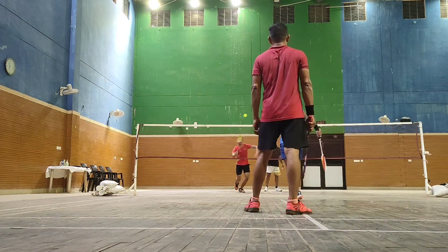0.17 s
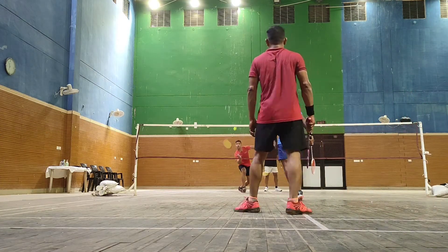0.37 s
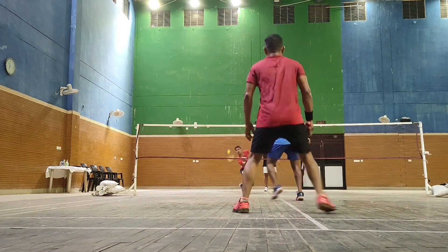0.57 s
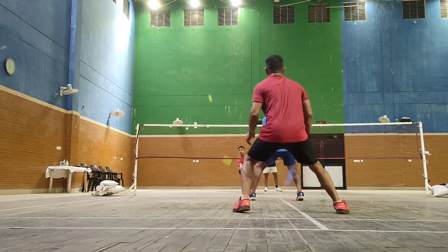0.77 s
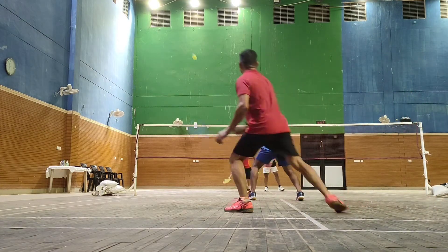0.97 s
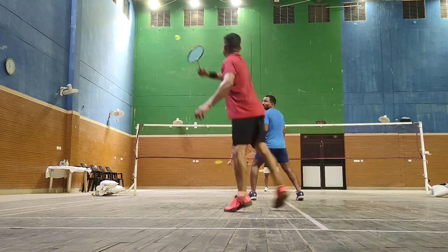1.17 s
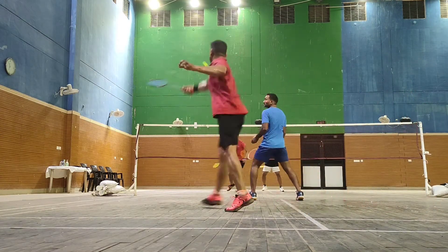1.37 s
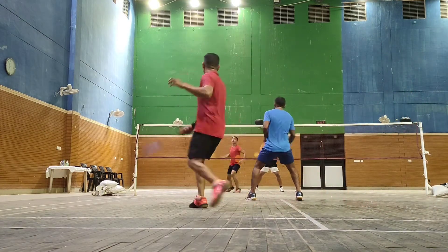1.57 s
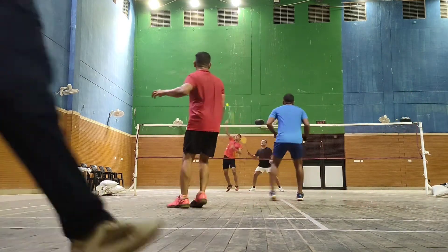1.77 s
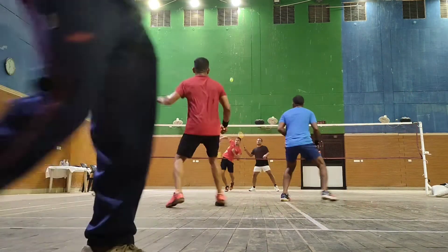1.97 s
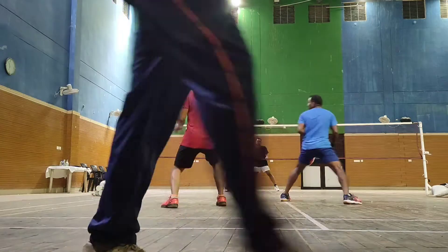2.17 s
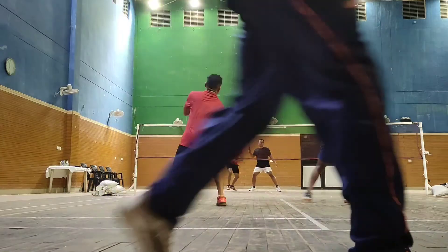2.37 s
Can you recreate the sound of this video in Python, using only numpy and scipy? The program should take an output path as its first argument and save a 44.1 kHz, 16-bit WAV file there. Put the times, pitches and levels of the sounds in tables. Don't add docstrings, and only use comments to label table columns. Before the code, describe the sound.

Badminton rackets hit a shuttlecock three times in a big reverberant hall, amid footsteps and rustling cloth.

```python
import sys
import numpy as np
from scipy import signal
from scipy.fft import rfft, irfft, next_fast_len
from scipy.io import wavfile
from scipy.ndimage import uniform_filter1d

SR = 44100
rng = np.random.default_rng(int(sys.argv[2]) if len(sys.argv) > 2 else 0)


def transcribe(u):
    v = np.clip(np.atleast_2d(u).T, -1, 1)
    q = np.round(v * 32767).astype(np.int16)
    wavfile.write(sys.argv[1], SR, q)


def convert_level_to_amplitude(level_db):
    exponent = np.asarray(level_db, float) / 20
    return 10 ** exponent


N = 106986

# frequency in Hz, level in dB.
HALL_SPECTRUM = [(60, -40), (150, -8.5), (400, -1), (1000, -2.5), (2500, 8), (5000, 5), (9000, -1),
                 (15000, -7.5)]


def rms_one(x):
    return x / np.sqrt(np.mean(x ** 2) + 1e-20)


def energy_one(x):
    return x / np.sqrt(np.sum(x ** 2) / 2)


def at_hz(points, hz):
    table = np.array(points)
    return np.interp(np.log(hz), np.log(table[:, 0]), table[:, 1])


def cut(x, hz, kind):
    sections = signal.butter(2, np.clip(hz, 10, .45 * SR), kind, fs=SR, output="sos")
    return signal.sosfilt(sections, x)


def click(s, db):
    return convert_level_to_amplitude(db) * np.maximum(0, 1 - np.abs(np.arange(N) - s * SR))


def ring(x, hz, t60):
    radius = convert_level_to_amplitude(-60 / (t60 * SR))
    w = 2 * np.pi * hz / SR
    return signal.lfilter([0, np.sin(w)], [1, -2 * radius * np.cos(w), radius * radius], x + 1e-18)


def dying(s, rise, t60):
    t = np.arange(N) / SR - s
    attack = np.sin(np.pi / 2 * np.clip(t / rise, 0, 1)) ** 2
    return attack * convert_level_to_amplitude(-60 * np.maximum(t - rise, 0) / t60)


def late(x, samples):
    size = next_fast_len(N + SR // 4)
    phase = np.exp(-2j * np.pi * np.arange(size // 2 + 1) * samples / size)
    return irfft(rfft(x, size) * phase, size)[..., :N]


def fold(x, response):
    size = next_fast_len(2 * N)
    return irfft(rfft(x, size) * rfft(response, size), size)[..., :N]


def diffuse(spectrum, t60s=None):
    # frequency in Hz, side minus mid in dB.
    stereo_width = [(60, -19), (110, -24), (200, -15.5), (380, -10.5), (700, -3), (1290, 0.5), (2380, -1),
                    (4400, 0), (8120, 0), (15000, 1)]
    out = 0
    edges = 22 * 2 ** np.arange(0, 10, .5)
    white = rng.standard_normal((2, 2, N))
    for k, (low, high) in enumerate(zip(edges, edges[1:])):
        mid, side = cut(white[k % 2], [low, high], "band")
        hz = np.sqrt(low * high)
        shape = 1 if t60s is None else dying(0, 0.016, at_hz(t60s, hz))
        spread = convert_level_to_amplitude(at_hz(stereo_width, hz)) * side * [[1], [-1]]
        out = out + convert_level_to_amplitude(at_hz(spectrum, hz)) * shape * (mid + spread)
    return out


def contact(s, contact_s):
    phase = np.clip((np.arange(N) / SR - s) / contact_s, 0, 1)
    push = np.sin(np.pi * phase) ** 4
    return push / push.sum() + 0.24 * click(s + contact_s / 2, 0)


def crack_noise(s, db, top_hz, air_db):
    hiss = cut(rng.standard_normal((2, N)), 1320, "high")
    hiss = hiss + 0.15 * hiss[::-1]
    dull = cut(hiss, top_hz, "low")
    airy = convert_level_to_amplitude(air_db) * cut(hiss, top_hz, "high")
    return convert_level_to_amplitude(db) * (dull - airy) * dying(s - .0003, .0012, .03)


def body_modes(hit, modes):
    total = 0
    for m, (hz, db, t60) in enumerate(modes):
        total = total + convert_level_to_amplitude(db) * (-1) ** (m + 1) * ring(hit, hz, t60)
    return cut(total, 230, "high")


def far_modes(hit, modes):
    ring_s = 0.005
    return sum(convert_level_to_amplitude(db) * np.sqrt(t60 / ring_s) * ring(hit, hz, ring_s) for hz, db, t60 in modes)


def wall_slap(pop, echo_s, echo_db):
    smear = rng.standard_normal((2, N)) * dying(echo_s + 0.0029, 0.00085, 0.0081)
    smear = smear + 2 * smear[0]
    echo = 0.26 * late(pop, echo_s * SR) + 0.13 * fold(pop, energy_one(smear))
    return convert_level_to_amplitude(echo_db) * cut(echo, 1200, "low")


def strokes():
    # start in seconds, wall echo delay in seconds, wall echo in dB, hall in dB, left lag in samples.
    stroke_rows = [
        (.2693, 0.076, -15, -17, -18),
        (1.4940, 0.08, -4, -25, 4.5),
        (2.0465, .0375, 1, -13, 2.5),
    ]
    # frequency in Hz, level in dB, t60 in seconds.
    smash_modes = [(240, -19.5, 0.03), (506, -13, 0.021), (796, -19, 0.063), (1060, -20, 0.13),
                   (1557, -21, 0.016), (1954, -21, 0.0086), (2600, -23.5, 0.0088), (7000, -47, .012)]
    clear_modes = [(440, -9, 0.013), (955, -14, 0.01), (974, -22, 0.14), (2705, -19.5, 0.099),
                   (3204, -13.5, 0.011),
                   (1510, -13, .045), (1942, -18, .07), (2220, -18, .09)]
    drive_modes = [(400, -16.5, 0.03), (815, -13, 0.0097), (1058, -24.5, 0.11), (1590, -19.5, 0.022),
                   (1930, -28.5, 0.089), (4100, -36, 0.0069)]
    # floor reflection delay in seconds, its level in dB, racket contact time in seconds.
    bounce_s = [.0078, .0025, .0042]
    bounce_db = [-16, -8, 2.5]
    contact_s = [0.00052, 0.00086, 0.0013]
    # crack in dB, its upper edge in Hz, share above that edge in dB, crack sent to the hall in dB.
    crack_db = [-22, -22, -30]
    crack_top_hz = [5950, 5900, 6170]
    crack_air_db = [2.5, -3.5, -12]
    far_crack_db = [4.5, 11.5, -1.5]
    # nearby scatter of the pop in dB, of the crack in dB.
    near_pop_db = [0, -5, 1.5]
    near_crack_db = [-4, 2.5, 9]

    direct, feed = np.zeros((2, N)), np.zeros(N)
    near = convert_level_to_amplitude(-8) * energy_one(diffuse(HALL_SPECTRUM) * dying(0.0057, 0.0033, 0.43))
    for k, modes in enumerate((smash_modes, clear_modes, drive_modes)):
        s, echo_s, echo_db, hall_db, lag = stroke_rows[k]
        hit = contact(s, contact_s[k])
        crack = crack_noise(s, crack_db[k], crack_top_hz[k], crack_air_db[k])
        pop = crack + body_modes(hit, modes)
        pop = pop + convert_level_to_amplitude(bounce_db[k]) * late(pop, bounce_s[k] * SR)
        far = far_modes(hit, modes)
        snap = cut(click(s + .012, far_crack_db[k]), 1320, "high")
        scatter = fold(convert_level_to_amplitude(near_pop_db[k]) * far + convert_level_to_amplitude(near_crack_db[k]) * crack, near)
        direct += [late(pop[0], lag / 2), late(pop[1], -lag / 2)]
        direct += wall_slap(pop, echo_s, echo_db) + scatter
        feed += convert_level_to_amplitude(hall_db + 15.0) * late(far + snap, max(echo_s - .013, 0) * SR)
    return direct, feed


def knocks():
    # start in seconds, level in dB, frequency in Hz, t60 in seconds, hall in dB.
    knock_rows = [(0.271, -26, 116, 0.025, -33), (.3495, -33, 515, 0.028, -30),
                  (.358, -25, 381, 0.13, -30.5), (0.598, -28, 416, 0.12, -35),
                  (0.8446, -33, 1047, 0.22, -32), (0.8451, -18.5, 435, 0.0082, -24.5),
                  (0.888, -27, 327, 0.023, -31), (1.0713, -27.5, 330, 0.023, -44),
                  (1.5734, -26.5, 466, 0.067, -27), (1.545, -32, 690, 0.073, -37.5),
                  (1.589, -11.5, 480, 0.011, -22), (1.615, -21, 460, .04, -35),
                  (1.634, -20.5, 899, 0.014, -20), (1.682, -20.5, 157.5, 0.059, -23),
                  (1.691, -40, 440, 0.036, -11), (1.683, -20.5, 297, 0.015, -23.5),
                  (1.688, -16.5, 376, 0.015, -31), (1.6913, -24.5, 403, .025, -30),
                  (1.707, -26.5, 420, 0.044, -32), (2.058, -31, 680, 0.055, -25),
                  (2.175, -26, 448, 0.05, -28.5), (2.292, -18.5, 430, 0.008, -31),
                  (2.352, -29.5, 886, 0.062, -23)]
    direct, feed = 0, 0
    for s, db, hz, t60, hall_db in knock_rows:
        knock = cut(ring(click(s, db), hz, t60), [hz / 2, 3 * hz], "band")
        direct = direct + knock
        feed = feed + convert_level_to_amplitude(hall_db + 28) * knock
    return direct, feed


def ticks():
    # start in seconds, level in dB, t60 in seconds, lowest Hz, highest Hz.
    tick_rows = [(0.2707, -16.5, 0.021, 1790, 4500), (1.061, -28, .03, 2680, 4700),
                 (2.047, -38, .06, 3000, 5000), (2.046, -27, .03, 6540, 8550),
                 (0.3514, -32, 0.063, 5000, 8900), (.845, -39, .03, 5500, 8600),
                 (1.064, -32.5, 0.036, 6100, 7915), (1.5902, -17.5, 0.012, 4330, 8640),
                 (2.084, -31, .04, 7000, 13920)]
    white = rng.standard_normal((2, N))
    white = white + 0.15 * white[::-1]
    total = 0
    for s, db, t60, low_hz, top_hz in tick_rows:
        total = total + convert_level_to_amplitude(db) * dying(s, 0.0004, t60) * cut(white, [low_hz, top_hz], "band")
    return total


def scuffs():
    # start in seconds, rise in seconds, level in dB, t60 in seconds, lowest Hz.
    scuff_rows = [(0.223, 0.031, -42, 0.081, 4720), (.28, 0.052, -41.5, 1, 4970),
                  (.844, 0.0023, -50.5, 0.44, 3995), (.99, 0.021, -55, 0.13, 9000),
                  (1.064, 0.0043, -48, 0.041, 13800), (1.399, 0.0084, -62.5, 0.1, 9300),
                  (1.587, 0.0013, -32.5, 0.017, 7900), (1.499, 0.012, -38.5, 0.41, 7000),
                  (1.6, 0.036, -40, 0.42, 3940), (1.957, 0.029, -44.5, 0.37, 7900),
                  (1.781, 0.049, -58, 0.19, 5020), (2.049, 0.019, -40.5, 0.49, 5020),
                  (2.285, 0.0053, -40.5, 0.046, 2540), (2.372, 0.0047, -51, 0.19, 7000)]
    grain_db = 2.5 * rng.standard_normal(N // 120 + 1).repeat(120)[:N]
    white = rng.standard_normal((2, N)) * convert_level_to_amplitude(grain_db)
    white = (white + 0.3 * white[::-1]) * convert_level_to_amplitude(np.array([[.8], [-.8]]))
    total = 0
    for s, rise, db, t60, low_hz in scuff_rows:
        total = total + convert_level_to_amplitude(db) * dying(s, rise, t60) * cut(white, low_hz, "high")
    return total


def hall_response():
    # frequency in Hz, t60 in seconds.
    hall_t60 = [(100, 1.9), (500, 4.16), (2000, 3.8), (7000, 2.51), (14000, 2.9)]
    return convert_level_to_amplitude(3.0) * energy_one(diffuse(HALL_SPECTRUM, hall_t60))


def steps():
    # time in seconds, level in dB.
    rumble_db = [(0, -85), (1.47, -80), (1.5, -51), (1.54, -75), (1.59, -48), (1.64, -58), (1.69, -53),
                 (1.8, -65), (1.95, -50.5), (2.05, -46), (2.09, -70), (2.28, -58), (2.43, -69)]
    s, db = np.transpose(rumble_db)
    rumble = rms_one(cut(rng.standard_normal(N), [45, 153], "band"))
    return convert_level_to_amplitude(np.interp(np.arange(N) / SR, s, db)) * rumble


def air_murmur():
    # frequency in Hz, level in dB.
    air_spectrum = [(25, -40), (60, -16.5), (140, -5.5), (300, -6), (1000, -17.5), (3000, -24),
                    (7000, -36.5), (15000, -37)]
    return convert_level_to_amplitude(-45) * rms_one(diffuse(air_spectrum))


def port(x):
    # frequency in Hz, width in Hz, level in dB.
    port_rows = [(4810, 4460, -8), (6707, 1000, 9.5), (10700, 5800, -5), (16200, 670, -1)]
    for hz, width, db in port_rows:
        r = np.exp(-np.pi * width / SR)
        poles = [1, -2 * r * np.cos(2 * np.pi * hz / SR), r * r]
        band = signal.lfilter(np.array([1, 0, -1]) * (1 - r * r) / 2, poles, x)
        x = x + (convert_level_to_amplitude(db) - 1) * band
    return x


def scene():
    direct, feed = strokes()
    taps, tap_feed = knocks()
    reverb = fold(feed + tap_feed, hall_response())
    play = cut(direct + taps + scuffs() + ticks() + reverb, 88, "high")
    return port(play + air_murmur()) + steps()


def denoise(x):
    duck_from_hz = 2200
    hz, _, cells = signal.stft(x, SR, nperseg=2048)
    power = uniform_filter1d(np.mean(np.abs(cells) ** 2, axis=0), size=7, axis=0) + 1e-20
    around = np.exp(uniform_filter1d(np.log(power), size=61, axis=0))
    faint = 1 / (1 + (power / (1.05 * around)) ** 8)
    faint = faint * np.clip(hz / duck_from_hz - .5, 0, 1)[:, None]
    treble = np.pad(np.mean(np.log(power[hz > duck_from_hz]), axis=0), (2, 0), "edge")
    jump = np.exp(treble[2:] - np.minimum(treble[1:-1], treble[:-2]))
    faint = faint / (1 + (jump / 2.2) ** 6)
    return signal.istft(cells * convert_level_to_amplitude(-22 * faint), SR, nperseg=2048)[1][:, :N]


def band_limit(x):
    return signal.sosfilt(signal.butter(12, 16660, fs=SR, output="sos"), x)


def record(dry):
    top_cut = signal.cheby2(8, 30, 15700 + 500, fs=SR, output="sos")
    x = signal.sosfilt(top_cut, denoise(dry))
    return band_limit(np.tanh(x))


dry = scene()
out = record(dry)
transcribe(out)
```